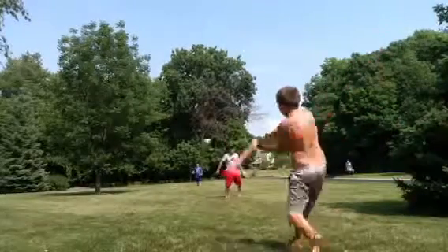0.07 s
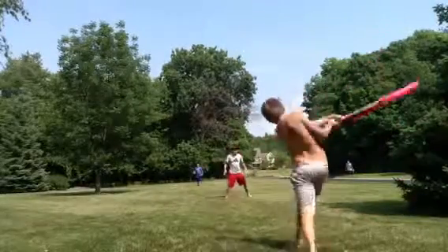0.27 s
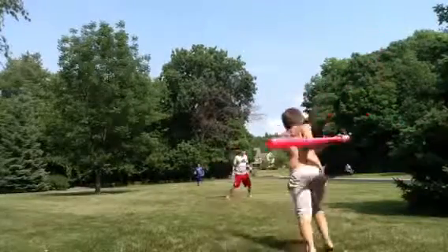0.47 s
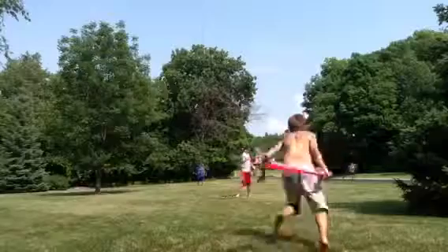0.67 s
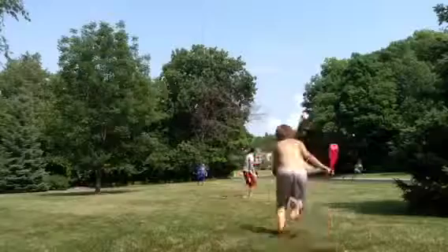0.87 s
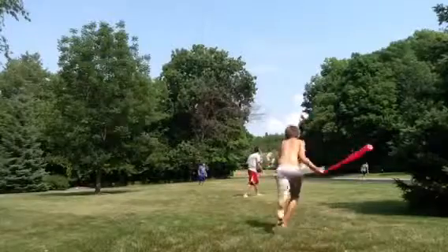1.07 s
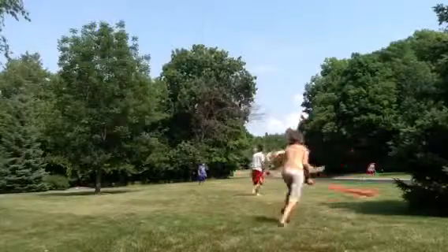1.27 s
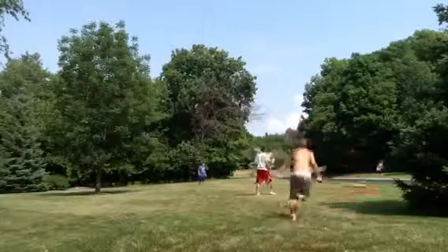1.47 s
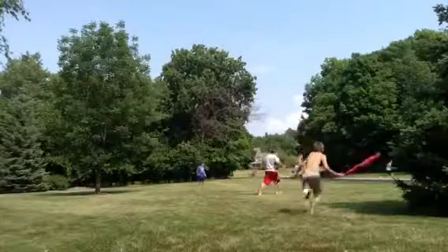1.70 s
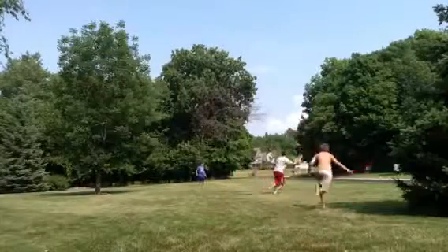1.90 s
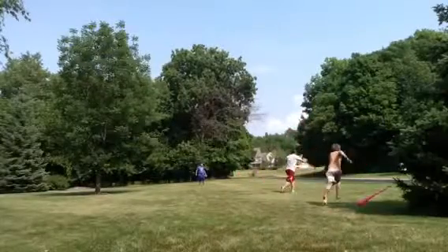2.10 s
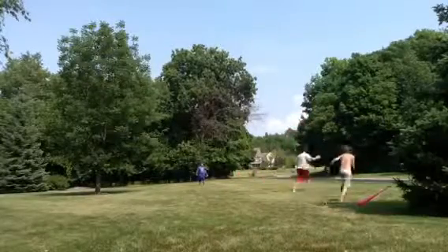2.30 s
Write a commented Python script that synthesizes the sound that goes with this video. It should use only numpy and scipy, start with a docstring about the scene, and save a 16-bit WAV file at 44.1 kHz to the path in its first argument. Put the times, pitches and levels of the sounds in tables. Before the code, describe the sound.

A plastic bat cracks sharply against a ball, then faint footsteps run off over grass.

```python
"""A hollow plastic bat swishes and cracks against a ball on a lawn ringed by trees.
The barrel dents, snaps back and rings briefly; the ground and the tree lines throw the crack back.
The batter runs off over the grass and drops the bat, with soft thuds and brushing.
A limiter ducks the outdoor hush and a faint low drone at the hit, then slowly lets them back."""
import sys
import numpy as np
from scipy import signal
from scipy.fft import rfft, irfft
from scipy.io import wavfile
from scipy.ndimage import uniform_filter1d, minimum_filter1d

SR = 44100
rng = np.random.default_rng(int(sys.argv[2]) if len(sys.argv) > 2 else 0)


def waveform_to_disk(signal):
    """Save audio, clipped to [-1, 1], as 16-bit WAV at the path in sys.argv[1]."""
    frames = np.transpose(np.atleast_2d(signal))
    scaled = np.clip(frames, -1, 1) * 32767
    samples = np.round(scaled).astype(np.int16)
    wavfile.write(sys.argv[1], SR, samples)


N = 108045
TIME = np.arange(N) / SR
HIT_S, HIT_DB = 0.2279, 12

# Shell crack spectrum: freq_hz, gain_db
CRACK_SPECTRUM = [(100, -5), (350, -0.5), (650, 10.5), (1200, 7), (1600, 5), (2200, -4.5), (3500, -0.5),
                  (6000, -4), (7500, -10), (10000, -17), (13000, -23.5), (15500, -49.5)]
# Air shoved aside by the dent: freq_hz, gain_db
PUSH_SPECTRUM = [(50, -11.5), (120, 1), (180, 3), (270, -1), (370, -25), (600, -16.5), (1500, -34.5),
                 (15000, -70.5)]
# Ringing tones of the hit, from the bat and its ground bounce: pitch_hz, gain_db, t60_s
HIT_TONES = [(490, -13, 0.1), (584, -11, 0.026), (823, -25.5, 0.027), (1110, -27, 0.036),
             (1480, -22.5, 0.033), (2090, -15, .01), (2864, -26, 0.023), (4400, -40.5, 0.021),
             (5853, -15.5, 0.0046), (6740, -23.5, 0.009)]


def bat_hit(rebound_s=0.00092, rebound_db=-6.5, rattle_t60_s=0.031):
    """The thin wall dents, snaps back, shoves a low push of air and rattles; brief tones ring on."""
    t = TIME[:SR // 4]
    click = 1. * (t == 0)
    dent = colour(click, CRACK_SPECTRUM)
    rebound = amp(rebound_db) * delayed(dent, rebound_s)[:len(t)]
    crack = amp(4.5) * (dent - rebound)
    push = -amp(25) * colour(click, PUSH_SPECTRUM)
    ring = sum(amp(db) * decay(t, t60) * np.sin(2 * np.pi * hz * t) for hz, db, t60 in HIT_TONES)
    wall_noise = unit(colour(rng.standard_normal(len(t)), CRACK_SPECTRUM))
    rattle = amp(-17.5) * decay(t, rattle_t60_s) * wall_noise
    blow = crack + cut(ring, hz=8350, kind="low", order=3) + push + rattle
    return amp(HIT_DB) * delayed(cut(blow, hz=126, kind="high", order=4), HIT_S)


# Crack scattered by grass and leaves: freq_hz, gain_db
SCATTER_SPECTRUM = [(100, -2.5), (250, 12.5), (500, 10), (700, 18.5), (950, 20.5), (1450, 11.5),
                    (2350, 18.5), (3200, 11.5), (5500, 17.5), (7500, 9.5), (10000, 3), (15000, -2.5)]
# Lawn and tree echoes: delay_s, rise_s, gain_db, t60_s, low_cut_hz, high_cut_hz
ECHO_PATHS = [(.006, 0.017, -21.5, 0.42, 130, 12200), (0.036, .002, -31, 0.054, 130, 400),
              (0.079, 0.011, -23, 0.21, 130, 1200), (.105, 0.015, -28, 0.61, 298, 5560),
              (.225, 0.027, -29, 1.38, 630, 3300)]


def lawn_echoes(hit, ground_delay_s=0.0048):
    """A dull ground bounce, then diffuse foliage echoes of the barrel's low note and the crack's hiss."""
    ground = amp(-13) * delayed(cut(hit, hz=2800, kind="low", order=1), ground_delay_s)
    click = 1. * (TIME == 0)
    hiss = amp(HIT_DB) * delayed(colour(click, SCATTER_SPECTRUM), HIT_S)
    low_note = amp(-3) * cut(hit, hz=700, kind="low", order=4)
    response = np.zeros(N)
    for delay_s, rise_s, db, t60_s, low_cut_hz, high_cut_hz in ECHO_PATHS:
        taps = rng.standard_normal(N) * np.minimum(TIME / rise_s, 1) * decay(TIME, t60_s)
        taps = cut(taps / np.linalg.norm(taps), low_cut_hz, "high", order=2)
        response += amp(db) * delayed(cut(taps, high_cut_hz, "low", order=2), delay_s)
    return ground + signal.fftconvolve(hiss + low_note, response)[:N]


# Air rushing past the bat: freq_hz, gain_db
SWISH_SPECTRUM = [(40, -1), (130, -8.5), (240, 7), (400, -2), (800, -15), (1600, -18), (5000, -26),
                  (15000, -36)]


def swish(peak_s=0.2254, width_s=0.031, level_db=-41):
    """A low rush of air swells as the bat comes round."""
    swell = np.exp(-((TIME - peak_s) / width_s) ** 2)
    return amp(level_db) * swell * unit(colour(rng.standard_normal(N), SWISH_SPECTRUM))


# Feet and bat on turf: start_s, level_db, pitch_hz, length_s
TURF_THUDS = [(0.07, -49, 278, 0.0059), (.912, -56, 247, 0.036), (1.35, -54, 240, 0.03),
              (1.615, -54, 130, 0.0061), (1.715, -55.5, 126, 0.04), (1.739, -50, 1840, 0.0066),
              (1.742, -51, 384, 0.017), (1.799, -59, 230, 0.025), (1.845, -56, 140, 0.045),
              (1.948, -58, 141, 0.048), (2.232, -46, 267, 0.0061), (2.278, -50, 363, 0.018),
              (2.392, -55, 252, 0.0097)]


def thuds(width_octaves=0.46):
    """Feet and the dropped bat knock on soft turf, each a short burst of band noise."""
    octave = np.log2(np.fft.rfftfreq(N, 1 / SR) + 1)
    noise_spectrum = rfft(rng.standard_normal(N))
    knocks = np.zeros(N)
    for start_s, db, hz, length_s in TURF_THUDS:
        band = np.exp(-((octave - np.log2(hz)) / width_octaves) ** 2 / 2)
        knocks += amp(db) * puff(start_s, length_s) * unit(irfft(noise_spectrum * band, N))
    return cut(knocks, hz=81.6, kind="high", order=4)


# Brushes of grass and clothes: start_s, level_db, length_s
BRUSH_STROKES = [(.06, -80, 0.023), (1.777, -59.5, 0.045), (1.828, -62.5, 0.092), (2.289, -60.5, 0.043)]
# Brushing spectrum: freq_hz, gain_db
BRUSH_SPECTRUM = [(200, -49.5), (900, -7.5), (1900, 16), (3200, 6.5), (6000, -1), (15000, -35)]


def brushing():
    """Grass and clothes rub in brief puffs of hiss."""
    envelope = sum(amp(db) * puff(start_s, length_s) for start_s, db, length_s in BRUSH_STROKES)
    return envelope * unit(colour(rng.standard_normal(N), BRUSH_SPECTRUM))


# Outdoor background spectrum: freq_hz, gain_db
HUSH_SPECTRUM = [(15, -39), (25, -22), (64, -29.5), (84, -12), (122, -4.5), (214, -0.5), (265, -2.5),
                 (366, -6), (519, -8), (644, -8), (820, -12), (1070, -11), (1290, -16), (1830, -17),
                 (2600, -15.5), (5090, -19.5), (15300, -31.5)]


def hush(level_db=-54.5, patch_depth_db=2):
    """Distant rumble and leaf hiss drift in faint patches."""
    frames = dict(fs=SR, nperseg=2048, noverlap=1536)
    hz, _, bins = signal.stft(rng.standard_normal(N), **frames)
    patches = uniform_filter1d(rng.standard_normal(bins.shape), size=16, axis=0)  # across frequency
    patches = unit(uniform_filter1d(patches, size=8, axis=1))  # across time
    bins = bins * amp(spectrum_db(HUSH_SPECTRUM, hz)[:, None] + patch_depth_db * patches)
    _, noise = signal.istft(bins, **frames)
    return amp(level_db) * unit(noise[:N])


def hum(pitch_hz=104.5, width_hz=12, level_db=-67.5):
    """A far, wavering drone from a narrow band of noise."""
    band = np.exp(-((np.fft.rfftfreq(N, 1 / SR) - pitch_hz) / width_hz) ** 2)
    return amp(level_db) * unit(irfft(rfft(rng.standard_normal(N)) * band, N))


def amp(db):
    """Decibels to gain."""
    return 10 ** (np.asarray(db) / 20)


def unit(x):
    """Scales to rms 1."""
    return x / np.sqrt(np.mean(x ** 2) + 1e-20)


def spectrum_db(spectrum, hz):
    """Interpolates a spectrum table over log frequency."""
    freq_hz, gain_db = np.transpose(spectrum)
    return np.interp(np.log(hz + 1), np.log(freq_hz + 1), gain_db)


def colour(x, spectrum, size=4096):
    """Minimum-phase filter with the given spectrum."""
    hz = abs(np.fft.fftfreq(size, 1 / SR))
    log_gain = np.log(amp(spectrum_db(spectrum, hz)))
    response = np.exp(np.conj(signal.hilbert(log_gain)))
    taps = np.fft.ifft(response).real[:size // 2]
    return signal.oaconvolve(x, taps)[:len(x)]


def cut(x, hz, kind, order):
    """Low-pass or high-pass."""
    return signal.sosfilt(signal.butter(order, hz, kind, fs=SR, output="sos"), x)


def delayed(x, delay_s):
    """Delays x and fits it to N samples."""
    return np.pad(x, (round(delay_s * SR), N))[:N]


def decay(t, t60_s):
    """Envelope falling 60 dB in t60_s."""
    return np.exp(-np.log(1000) * t / t60_s)


def puff(start_s, length_s):
    """Envelope peaking half of length_s after its start, with a soft fall."""
    age = np.maximum(TIME - start_s, 0) / (length_s / 2)
    return age * np.exp(1 - age)


def scene():
    """The hit, its echoes and the batter's movements over the quiet lawn, in mono."""
    hit = bat_hit()
    return (hit + lawn_echoes(hit) + swish() + thuds() + brushing() + hush() + hum())[None]


def record(dry, limit_db=-0.3, recovery_s=1.073, cutoff_hz=15400):
    """A peak limiter clamps at once and recovers slowly; a steep low-pass follows."""
    headroom_db = minimum_filter1d(-20 * np.log10(abs(dry[0]) + 1e-9), size=48)
    excess_db = np.maximum(-headroom_db - limit_db, 0)
    recovery = np.exp(-TIME / recovery_s)
    duck_db = np.maximum.accumulate(excess_db / recovery) * recovery
    limited = dry * amp(-uniform_filter1d(duck_db, size=32))
    low_pass = signal.firwin(511, cutoff_hz, window=("kaiser", 9), fs=SR)
    return signal.oaconvolve(limited, low_pass[None], "same")


dry = scene()
out = record(dry)
waveform_to_disk(out)
```